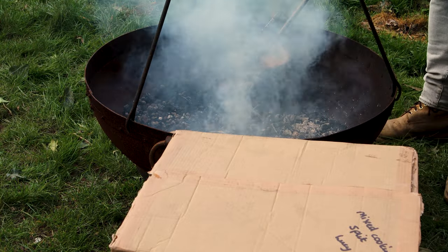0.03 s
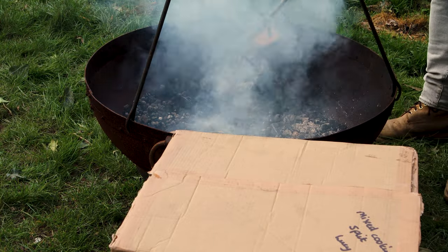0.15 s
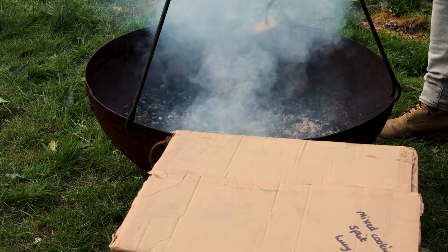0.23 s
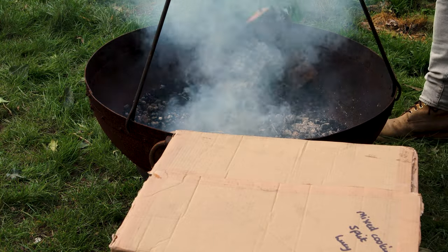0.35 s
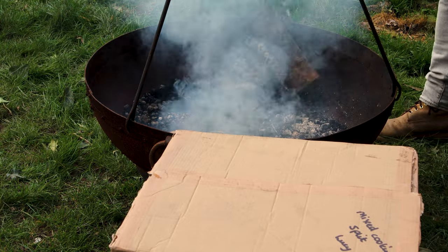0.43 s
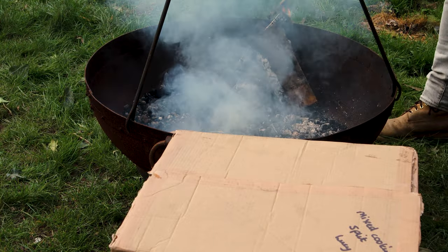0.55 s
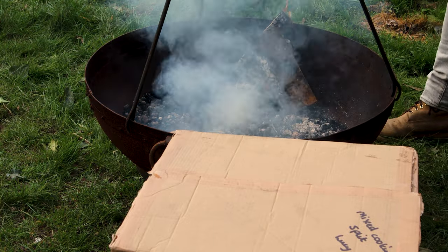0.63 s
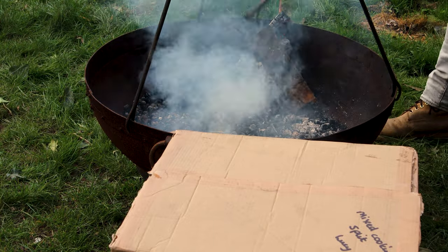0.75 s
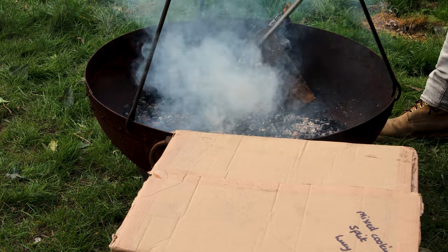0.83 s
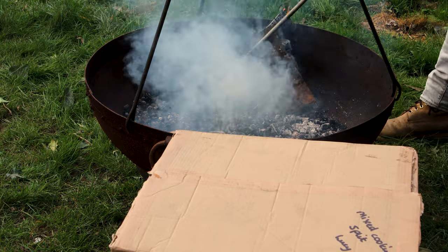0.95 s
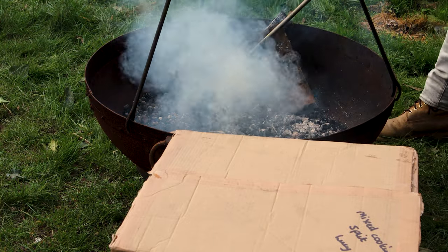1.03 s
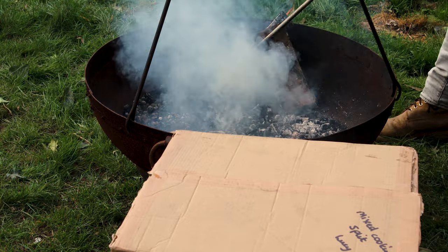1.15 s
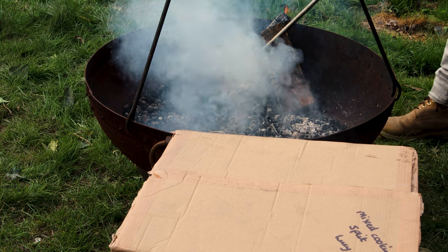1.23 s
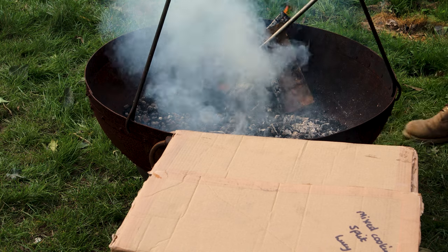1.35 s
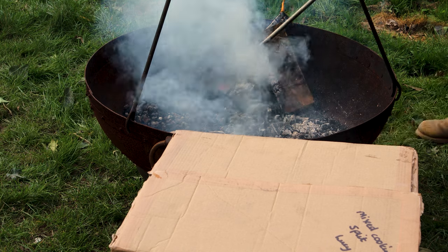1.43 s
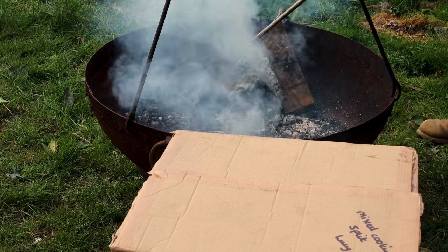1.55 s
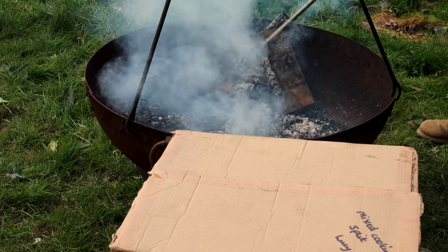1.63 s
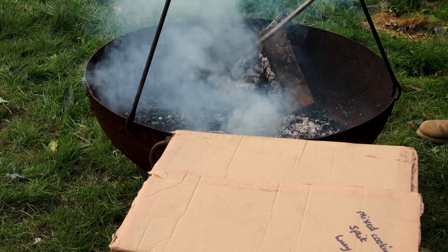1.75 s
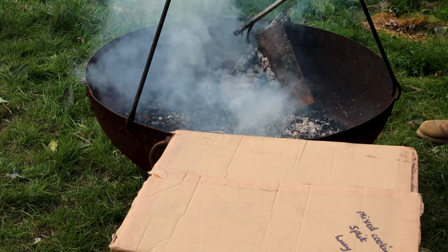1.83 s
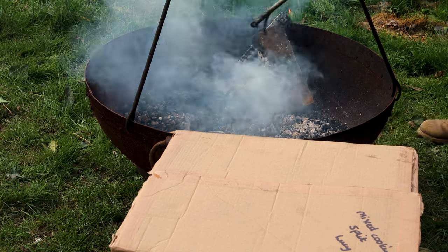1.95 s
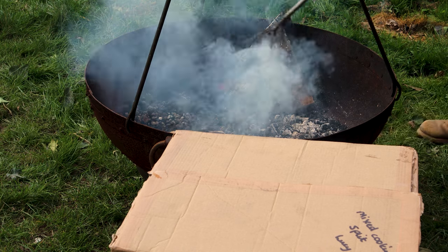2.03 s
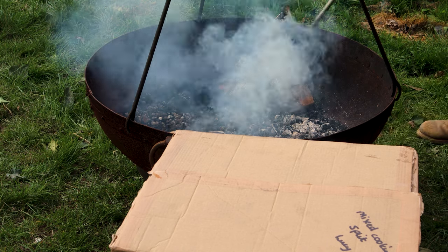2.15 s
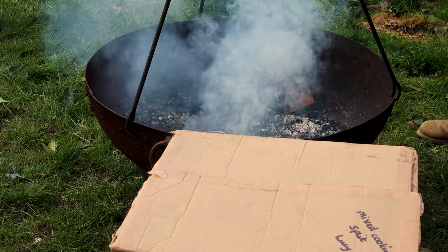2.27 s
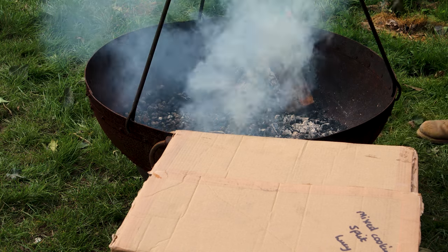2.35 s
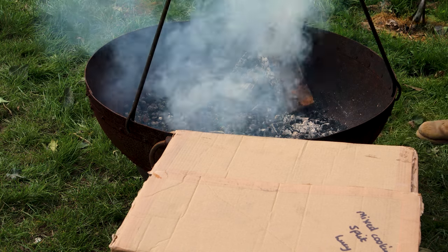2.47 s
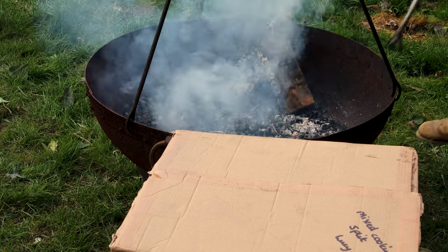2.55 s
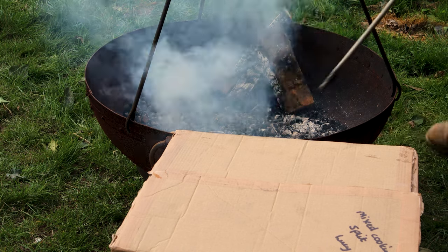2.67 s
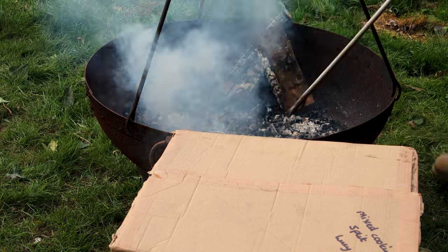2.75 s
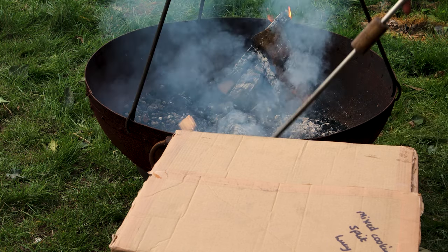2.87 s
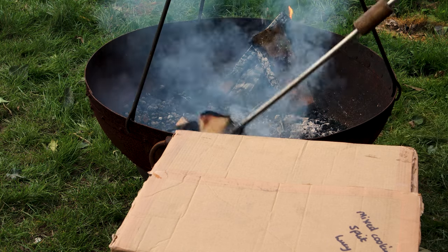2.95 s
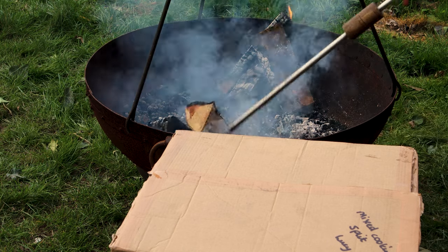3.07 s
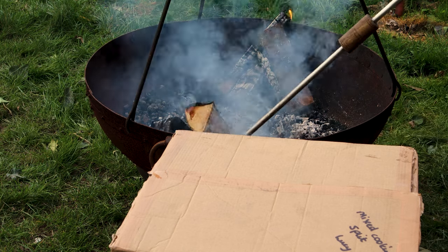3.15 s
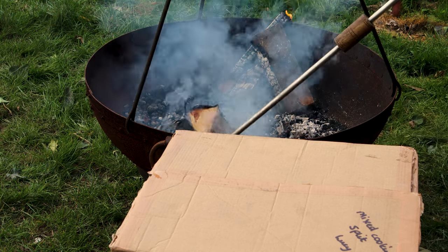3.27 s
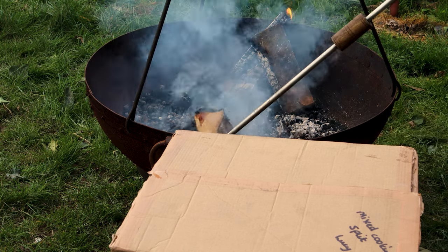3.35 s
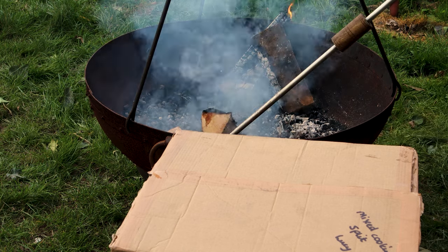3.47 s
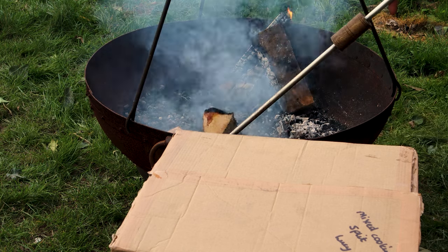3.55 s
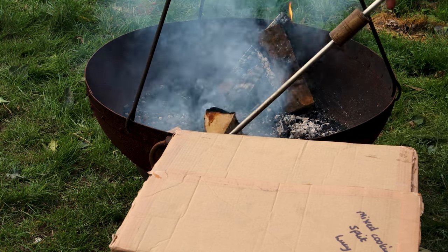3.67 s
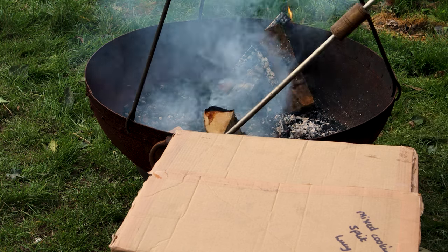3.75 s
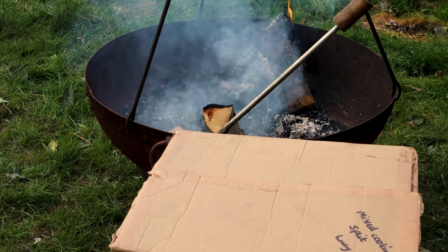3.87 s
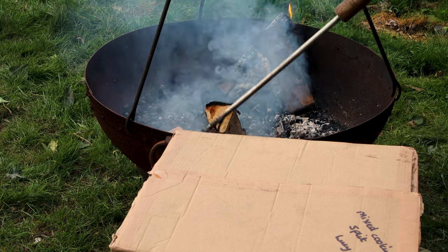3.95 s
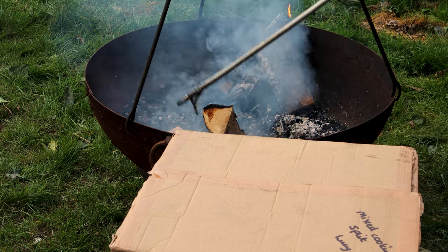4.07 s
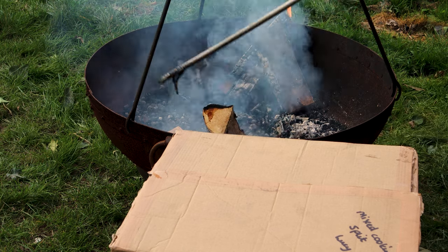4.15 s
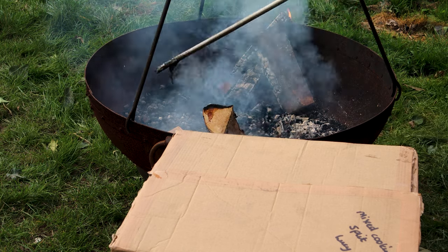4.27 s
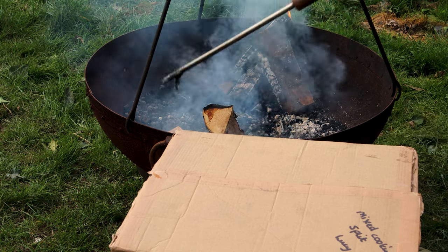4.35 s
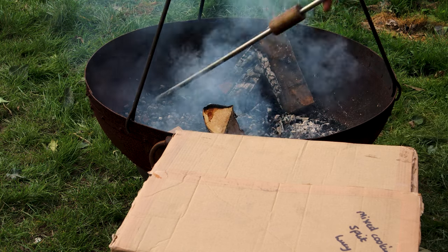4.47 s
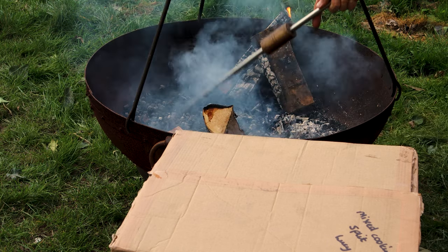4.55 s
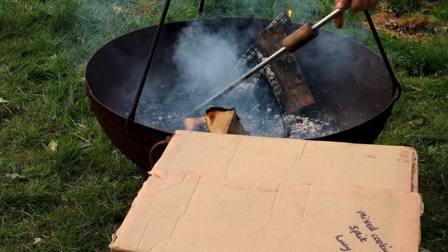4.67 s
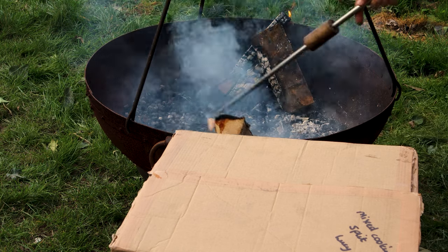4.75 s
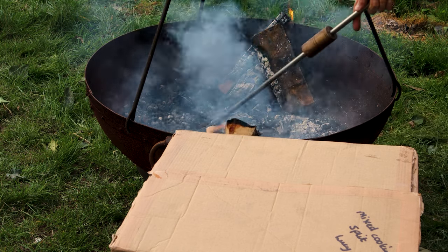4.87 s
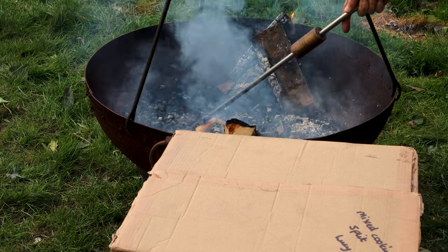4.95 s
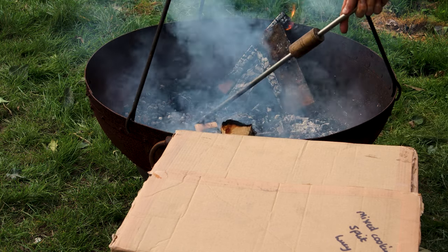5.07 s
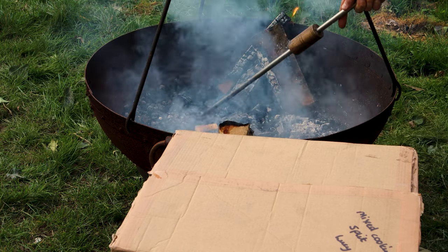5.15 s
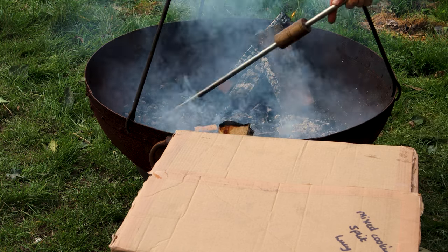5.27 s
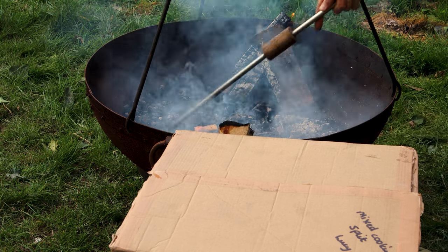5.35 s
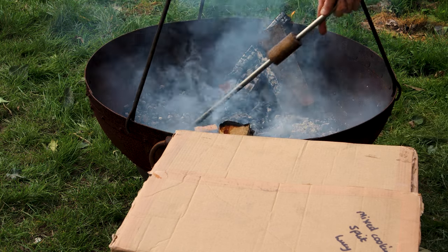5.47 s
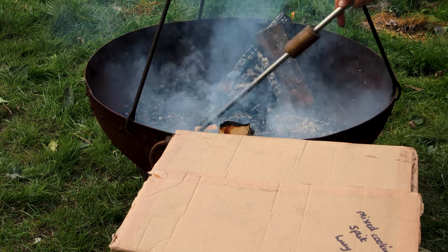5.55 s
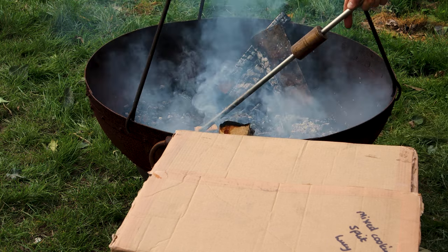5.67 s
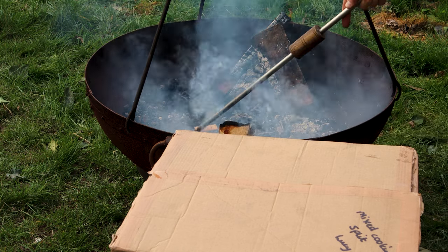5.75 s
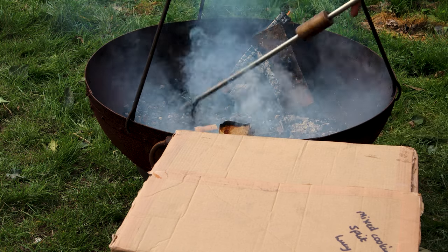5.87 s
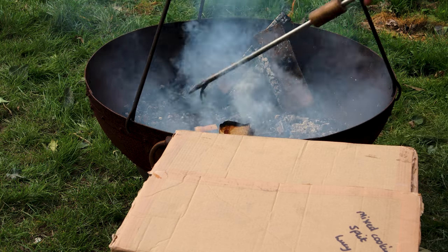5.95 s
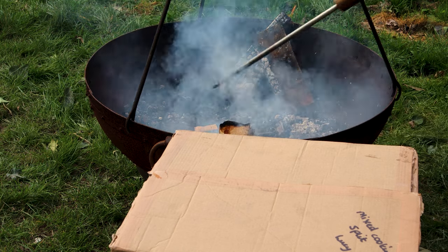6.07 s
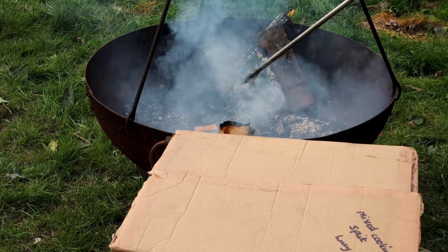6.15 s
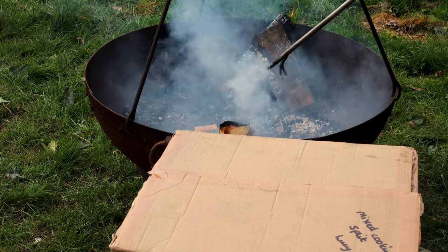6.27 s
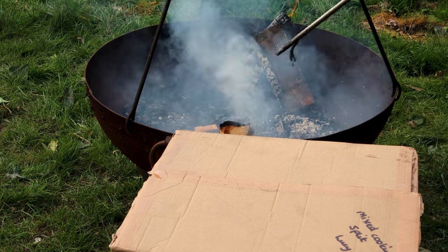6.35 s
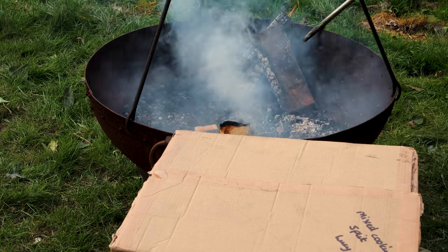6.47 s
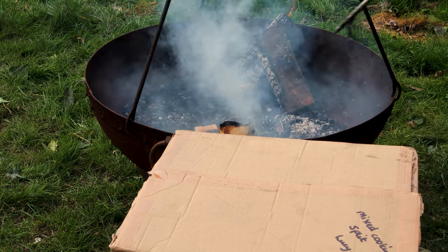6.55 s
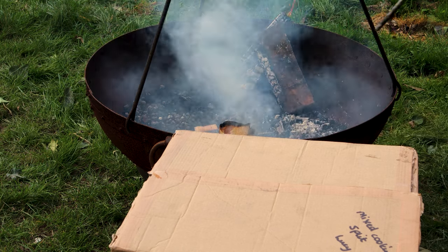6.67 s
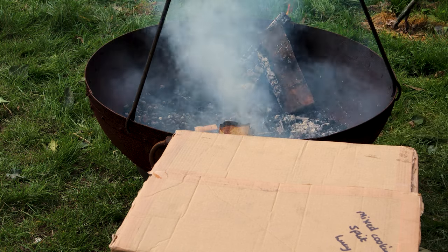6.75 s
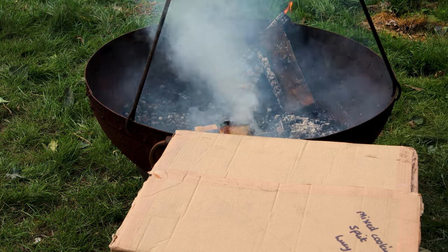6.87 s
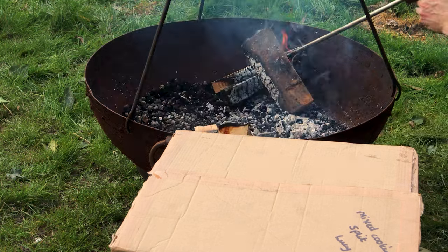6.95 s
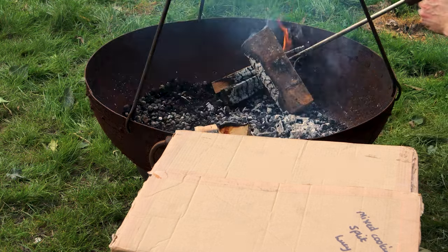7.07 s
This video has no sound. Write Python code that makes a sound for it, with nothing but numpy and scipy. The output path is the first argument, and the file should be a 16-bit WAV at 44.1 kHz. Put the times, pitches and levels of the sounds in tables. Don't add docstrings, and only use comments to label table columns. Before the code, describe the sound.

Close outdoor fire bowl on a lawn. Light clanks and wooden thuds lead quickly to one huge, clipped clang as a heavy log hits iron. Smaller knocks follow, then tongs rake gritty embers and scrape bare metal while a bird whistles two-note phrases from a tree. A log bumps down heavily, handling thins to crackles and pops, and a nearer bird chirps at the end.

```python
import sys
import numpy as np
from scipy import signal
from scipy.fft import rfft, irfft
from scipy.io import wavfile
from scipy.ndimage import uniform_filter1d

SR = 44100
rng = np.random.default_rng(int(sys.argv[2]) if len(sys.argv) > 2 else 0)


def ratio(d):
    e = np.asarray(d, float) / 20
    return 10 ** e


def inscribe(sig):
    pcm = np.round(np.clip(np.atleast_2d(sig).T, -1, 1) * 32767)
    wavfile.write(sys.argv[1], SR, pcm.astype(np.int16))


N = 313551


def level(x, db):
    return x * ratio(db) / np.sqrt(np.mean(x ** 2))


def peak(x, db):
    return x * ratio(db) / np.max(np.abs(x))


def add(out, x, start_s):
    i = int(start_s * SR)
    out[i:i + len(x)] += x[:N - i]


def seconds(length_s):
    return np.arange(int(length_s * SR)) / SR


def colour(x, points):
    hz, db = np.transpose(points)
    bins = np.maximum(np.fft.rfftfreq(len(x), 1 / SR), 1)
    gain = ratio(np.interp(np.log(bins), np.log(hz), db))
    return irfft(rfft(x) * gain, len(x))


def walk(rate):
    k = int(SR / rate)
    held = np.repeat(rng.standard_normal(N // k + 1), k)
    return 1.4 * uniform_filter1d(uniform_filter1d(held, k), k)[:N]


def grains(size, rate, spread_db):
    hit = rng.random(size) < rate / SR
    return hit * rng.standard_normal(size) * ratio(spread_db * np.minimum(rng.exponential(size=size), 3))


def ring(modes, stretch=1., scatter_db=0., length_s=0.16):
    hz, width, db = np.transpose(modes)[:, :, None]
    t = seconds(length_s)
    decay = width * np.exp(-np.pi * width * t)
    return np.sum(ratio(db + scatter_db) * decay * np.sin(2 * np.pi * hz * stretch * t), axis=0)


# pitch_hz, level_db (per Hz)
AIR_SPECTRUM = [(12, -43), (20, -13), (130, -0.5), (285, -8), (430, -13.5), (1810, -24), (3750, -23.5),
                (7000, -36)]
# time_s, level_db
WIND = [
    (0.0, -60),
    (0.55, -55.5),
    (0.69, -57),
    (2.199, -65),
    (4.06, -63.5),
    (4.22, -67),
    (4.851, -66),
    (7.11, -60.5),
]


def air():
    s, db = np.transpose(WIND)
    gust_db = np.interp(np.arange(N) / SR, s, db - np.mean(db))
    out = 0
    for hz in 30 * 2 ** np.arange(0, 9.1, .75):
        edges = [(hz / 2, -60), (hz / 1.25, 0), (hz * 1.25, 0), (hz * 2, -60)]
        band = colour(rng.standard_normal(N), edges)
        bass_share = np.clip(1.3 - np.log10(hz) / 3, 0, 1)
        out = out + band * ratio(2.0 * walk(9.8) + gust_db * bass_share)
    return level(colour(out, AIR_SPECTRUM), -58)


def garden(x, t60_s, db):
    t = seconds(.6)
    tail = colour(rng.standard_normal(len(t)), [(200, 1.0), (1500, -9.0), (5000, -5.0), (12000, -14.0)])
    tail = tail * ratio(-60 * t / t60_s)
    return signal.fftconvolve(x, tail * ratio(db) / np.sqrt(np.sum(tail ** 2)))[:N]


def whistle(rows):
    s, hz, db, warble_hz = np.transpose(rows)
    t = np.arange(s[0], s[-1], 1 / SR)
    edge = np.minimum(np.minimum(t - s[0], s[-1] - t) / 0.002, 1)
    noise = rng.standard_normal(SR // 2)[:len(t)]
    shake = level(uniform_filter1d(uniform_filter1d(noise, size=60), size=60), 0)
    pitch_hz = np.interp(t, s, hz) + np.interp(t, s, warble_hz) * shake
    return np.sqrt(2) * edge * ratio(np.interp(t, s, db)) * np.sin(2 * np.pi * np.cumsum(pitch_hz) / SR)


# time_s, pitch_hz, level_db, warble_hz
STRAY_NOTES = [
    [(.885, 4850, -73.5, 31), (.93, 4820, -79.5, 30.6)],
    [(5.9, 3790, -79.5, 58.5), (6.06, 3650, -79, 59.2)],
    [(2.61, 3994, -68, 169), (2.8, 4170, -83.5, 170)],
]
# level_start_s, pitch_share, level_db, fall_start_s, fall_level_db
SONG = [
    (2.974, .98, -51, 3.137, -45.5),
    (3.441, 0.99, -47.5, 3.648, -52.5),
    (3.966, 0.982, -51.5, 4.149, -50),
    (4.436, 0.98, -49.5, 4.646, -49.5),
]
# time_s (from its start), pitch_hz, level_db, warble_hz
LEVEL_NOTE = [(0, 4490, -7, 33), (.009, 4710, -5.5, 22), (0.044, 4910, 0.5, 21), (0.086, 5010, -2.5, 47),
              (.15, 4930, -13.5, 20), (.168, 4850, -22, 33)]
# time_s (from its start), pitch_hz, level_db, warble_hz
FALL_NOTE = [(0, 8200, -11, 200), (.012, 7600, -8, 280), (.03, 7150, -8, 200), (.039, 4600, -9, 60),
             (.048, 4080, -3, 45), (.075, 3850, 0, 50), (.1, 3740, -6, 40), (.27, 3670, -19, 70)]
SCOOP, LEVEL_HZ = [0.51, 0.945, 0.097, 1.006], 4900
# time_s, pitch_hz, level_db, warble_hz
NEAR_CHIRP = [
    [(7.01, 4270, -55, 40), (7.022, 4400, -51.5, 40), (7.036, 4540, -56.5, 40.6)],
    [(7.045, 3740, -43, 30), (7.053, 4187, -36.5, 29.8), (7.088, 4330, -42.5, 30)],
    [(7.092, 4150, -49.5, 40), (7.1, 4180, -47, 40), (7.11, 4200, -48, 40.2)],
    [(7.008, 4680, -52, 40), (7.04, 4720, -58.5, 40), (7.11, 4700, -62, 60)],
]
# time_s, pitch_hz, level_db, warble_hz
NEAR_SECOND_VOICE = [
    [(7.018, 3300, -55.5, 96), (7.036, 3300, -59.5, 99.6)],
    [(7.05, 3300, -69, 99), (7.11, 3330, -71.5, 102.4)],
    [(7.078, 5100, -68, 99), (7.1, 5000, -58.5, 100)],
]


def birds():
    far, near = np.zeros(N), np.zeros(N)
    for note in STRAY_NOTES:
        add(far, whistle(note), note[0][0])
    for (s, share, db, fall_s, fall_db), scoop in zip(SONG, SCOOP):
        bend = (np.array(LEVEL_NOTE) - [0, LEVEL_HZ, 0, 0]) * [1, scoop, 1, 1]
        add(far, whistle(bend + [0, share * LEVEL_HZ, 0, 0]) * ratio(db), s)
        add(far, whistle(FALL_NOTE) * ratio(fall_db), fall_s)
    for note in NEAR_CHIRP + NEAR_SECOND_VOICE:
        add(near, whistle(note), note[0][0])
    return far + garden(far, 0.42, -3.5) + near + garden(near, 0.16, -13.5)


# pitch_hz, level_db (per Hz)
GRIT = [(2060, -25.5), (3500, -1.5), (3780, -3.5), (4490, -10.5), (4840, -11.5), (5360, -14.5),
        (8820, -12.5), (16000, -27)]
# start_s, peak_db, pitch_hz, click_db
POPS = [(.263, -47.5, 3720, -55), (.71, -32.5, 4480, -59.5), (.835, -38.5, 3330, -43),
        (.8669, -30.5, 7070, -51.5), (.9454, -43, 3230, -50), (1.5085, -35.5, 2740, -44),
        (1.728, -40.5, 3840, -60), (1.7474, -32.5, 8580, -60), (1.8198, -32, 2700, -40.5),
        (1.8447, -25, 3700, -44), (2.1455, -33, 3800, -67), (2.3321, -36.5, 4860, -50),
        (2.7526, -36, 3740, -46), (2.817, -36.5, 2700, -47), (2.8784, -23, 3420, -38.5),
        (3.246, -25, 3460, -57), (5.0014, -40.5, 1550, -47.5), (5.0674, -36, 2700, -45),
        (5.0983, -30, 3990, -59.5), (5.2021, -33, 3220, -65.5), (5.5189, -24.5, 3580, -54),
        (5.5487, -26, 3330, -41.5), (5.5674, -36, 3420, -38), (6.0716, -30, 4750, -45),
        (6.3535, -31, 3110, -68.5), (6.3704, -20.5, 3170, -50), (6.568, -30.5, 3370, -54),
        (6.8709, -28, 3275, -58.5), (6.8864, -40, 4000, -60)]
# start_s, peak_db
TICKS = [(0.127, -42.5), (.164, -35), (.195, -40.5), (.218, -43), (.808, -43.5), (1.058, -34),
         (1.2315, -38.5), (1.292, -41.5), (1.192, -43.5), (1.5789, -42), (1.871, -36.5), (1.908, -45.5),
         (1.921, -46), (1.971, -43.5), (1.9825, -39.5), (2.1003, -42), (2.4582, -36.5), (2.572, -41.5),
         (2.612, -45), (2.722, -42), (2.766, -45), (3.41, -38.5), (4.405, -44), (4.458, -43), (4.508, -36),
         (4.582, -41.5), (5.137, -43), (5.18, -42.5), (5.255, -48.5), (5.31, -47), (5.47, -40.5),
         (5.587, -35.5), (6.059, -37.5), (6.2, -45), (6.2404, -42), (6.276, -42), (6.6976, -38),
         (6.7445, -37.5), (6.9258, -44.5)]
TICK_HZ, TICK_CLICK_DB = 3300, -13


def fire():
    out, t = np.zeros(N), seconds(0.072)
    ticks = [(s, db, TICK_HZ * ratio(0.65 * rng.standard_normal()), db + TICK_CLICK_DB) for s, db in TICKS]
    for s, db, hz, click_db in POPS + ticks:
        noise = rng.standard_normal(len(t))
        cycles = t * hz
        note = np.sin(2 * np.pi * cycles) * np.minimum(cycles / 2.1, 1) * np.exp(-cycles / 0.76)
        note = note + 0.034 * noise * np.exp(-t / 0.0029)
        click = np.diff(noise * np.exp(-t / 0.00046))
        add(out, peak(note, db - 4.5), s)
        add(out, peak(click, click_db + 12.5), s)
    scatter = np.diff(colour(grains(N + 1, 150, 1.8), GRIT))
    return out + level(scatter, -74.5)


# start_s, length_s, level_db, pitch_hz
SPITS = [(0.251, .02, -52.5, 7040), (0.379, .012, -43, 9000), (.418, .008, -52, 8500),
         (0.476, .014, -50, 8000), (0.744, 0.014, -54, 9000), (1.004, .02, -51.5, 7470),
         (2.897, .016, -44, 9980), (2.954, .03, -39.5, 13170), (3.276, .014, -53.5, 9000),
         (3.49, .012, -62, 6940), (3.53, .015, -59, 7000), (3.899, .09, -50, 8850),
         (4.775, .045, -54, 12000), (4.91, .085, -53, 9500), (5.418, .025, -58, 13100),
         (5.47, .008, -53.5, 10000), (5.495, .006, -61, 10100), (5.535, .006, -53.5, 12000),
         (5.59, .012, -47.5, 12050), (5.676, .016, -60, 11000), (6.346, .008, -63.5, 11000)]
# start_s, peak_db, pitch_hz
SPARKS = [(0.3035, -54, 10300), (0.3272, -44, 8200), (0.814, -36, 11800), (0.9272, -42, 14700),
          (0.9356, -34, 8300), (0.9743, -41.5, 7170), (2.888, -29, 9570), (2.9332, -35, 14300),
          (3.089, -41, 9450), (4.72, -48, 8550), (4.8317, -34.5, 8060), (4.8474, -33, 9150),
          (4.9457, -36, 9010), (5.365, -56.5, 8710), (5.6514, -52, 8440), (5.7359, -51.5, 13380),
          (6.3733, -43.5, 7100), (6.4864, -22, 10940), (6.6709, -53, 7150), (6.7755, -52.5, 10130),
          (6.81, -52, 8700), (6.847, -56, 7750), (6.886, -50, 9460), (6.9436, -47, 7100)]


def ash():
    out, t = np.zeros(N), seconds(.01)
    for s, long, db, hz in SPITS:
        u = seconds(long + .03)
        force_db = np.interp(u, [0, .004, long, long + .03], [-15, 0.5, -0.5, -46])
        band = [(hz / 4, -25), (hz / 1.6, -5.0), (hz, 0), (hz * 1.1, -7.0)]
        burst = colour(grains(SR // 4, 9000, 2.2)[:len(u)], band)
        add(out, level(burst, db) * ratio(force_db), s)
    for s, db, hz in SPARKS:
        add(out, peak(np.sin(2 * np.pi * hz * t) * t * np.exp(-t * hz), db + 0.5), s)
    return out


# start_s, peak_db, pitch_hz,
# width_hz
BUMPS = [(1.8195, -41, 896, 900), (1.8445, -45, 700, 700), (1.673, -28, 714, 150), (3.283, -37, 340, 49.7),
         (3.335, -39, 357, 50), (1.086, -31.5, 404, 40), (3.339, -48, 610, 21.8), (3.4275, -31.5, 191, 30),
         (3.428, -29, 495, 60), (3.432, -26, 572, 32.3), (3.805, -26.5, 394, 50), (4.827, -8, 268, 170),
         (4.8275, -20, 620, 150), (4.8405, -14, 497, 55), (4.8445, -22, 804, 40), (4.861, -18, 523, 90),
         (4.876, -28, 476, 120), (4.893, -35, 400, 49.9), (6.3704, -42, 1000, 900),
         (6.871, -45.5, 1197, 900)]
# start_s, peak_db, pitch_hz,
# width_hz
PINGS = [(.579, -20, 1700, 34), (.58, -28, 2465, 33), (.602, -27, 1740, 37), (1.1374, -34, 1770, 87),
         (1.673, -31, 1100, 120), (2.851, -27, 1420, 25), (2.894, -29.5, 1390, 40), (3.956, -28, 359, 21),
         (3.8063, -28, 1640, 27), (3.8067, -22, 2590, 35), (3.968, -35, 2065, 14), (5.711, -50.5, 1484, 35),
         (6.698, -50, 2330, 48)]


def bumps():
    out, t = np.zeros(N), seconds(.15)
    for s, db, hz, width in BUMPS + PINGS:
        rise = np.sin(np.pi / 2 * np.minimum(t * hz, 1)) ** 2
        add(out, peak(rise * np.exp(-np.pi * width * t) * np.sin(2 * np.pi * hz * t), db), s)
    return out


# start_s, iron_db, log_db, grit_db, fade_db_per_s
SLIDES = [(.001, -54, -72, -60, 214), (.134, -49.5, -38.5, -69, 296), (.26, -50, -48.5, -57, 62),
          (.385, -39.5, -30.5, -44, 148), (0.502, -6.5, -7, -31.5, 427), (.55, -34, -34, -62, 134),
          (.6, -40, -37, -64.5, 311), (.724, -50.5, -70.5, -52.5, 169), (.93, -51.5, -41, -55, 202),
          (1.088, -45, -34, -70, 190), (1.14, -46.5, -49.5, -65.5, 257.5), (1.68, -63.5, -53.5, -64, 99),
          (3.29, -45.5, -36, -53, 387), (3.338, -40, -32, -52, 305), (3.44, -42.5, -39, -51, 200),
          (3.984, -35.5, -38.5, -41, 260), (4.61, -52, -47.5, -52, 301), (5.005, -51, -55, -58, 71),
          (5.412, -48, -49.5, -59.5, 204), (5.612, -55, -54, -63, 253), (5.689, -58, -65, -66.5, 122.5)]
# loudest_s, iron_db, log_db, grit_db, fade_db_per_s
ROLLS = [
    (4.842, -21.5, -18.5, -55, 329),
    (4.884, -37, -40, -56, 500.5),
]
# end_s, iron_db, log_db, grit_db, rise_db_per_s
PUSHES = [(.134, -44.5, -62, -56.5, 153), (.386, -41, -38, -48, 1800), (0.67, -53, -45, -64.5, 299.5),
          (1.185, -46, -44, -61.5, 91), (3.287, -35, -37, -52, 1499), (3.418, -40, -41, -58, 401),
          (3.433, -33, -39, -42, 2500.5), (3.8, -39, -45, -59, 149), (3.807, -27, -37, -60, 901),
          (3.97, -37, -30.5, -48, 219), (4.829, -38, -45, -44.5, 128), (5.684, -50, -60, -50, 1499)]
# start_s, length_s, iron_db, log_db, grit_db
RAKES = [(.576, .014, -21.5, -38, -42.5), (.6, 0.0039, -37, -41, -68), (1.3, 0.19, -61, -64, -63.5),
         (2.853, 0.052, -40, -43.5, -49), (2.884, 0.045, -42, -56, -45), (2.957, 0.029, -47.5, -48.5, -46),
         (2.98, 0.069, -43.5, -57.5, -50.5), (3.06, 0.061, -43, -62, -54), (3.135, 0.024, -54, -63.5, -67),
         (3.49, 0.0094, -51.5, -60.5, -56), (3.53, 0.0082, -47.5, -56, -60.5),
         (3.58, 0.0056, -57, -63, -60), (3.632, 0.048, -54.5, -65, -63), (3.695, 0.059, -61, -62, -48.5),
         (4.905, 0.088, -41.5, -48, -43), (5.425, .018, -41.5, -40, -61), (5.467, .008, -50, -42, -58),
         (5.492, 0.012, -47, -49, -59), (5.514, 0.022, -43, -45.5, -56), (5.545, 0.019, -41.5, -42, -48.5),
         (5.58, 0.013, -39, -46, -59), (6.564, 0.33, -62.5, -67, -70), (2.03, .11, -66, -54.5, -76.5),
         (4.1, 0.023, -56, -46, -58.5), (7.02, 0.052, -61, -57, -62.5)]
# start_s, length_s, iron_db, log_db, grit_db
SCRAPES = [
    (3.7, 0.087, -56, -53.5, -73),
    (3.81, 0.13, -36, -31.5, -56),
    (3.953, 0.0294, -29.5, -26.5, -55),
    (4.0, 0.085, -49.5, -43.5, -57.5),
]
# damping share, tilt in dB per octave, grain dB, damping share of the log
SLIDE_TOUCH, PUSH_TOUCH, SCRAPE_TOUCH = (4.5, 2, 1.1, 1.5), (1.1, 3, 1.3, 7.9), (0.9, 0.34, 3.1, 0.26)
ROLL_TOUCH, RAKE_TOUCH = (4.5, -10, 1, 1.5), (2.4, 4.8, 1.8, 2.03)
ROLL_RISE_S = 0.013
GRAB_S, GRAB_DB = 0.0031, -14.5
EDGE_DB_PER_S, RANGE_DB = 1300, 35


def strokes():
    rows = []
    for s, *db, fade in SLIDES:
        rows.append(([s, s + RANGE_DB / fade], [0, -RANGE_DB], db, SLIDE_TOUCH))
    for s, *db, fade in ROLLS:
        rows.append(([s - ROLL_RISE_S, s, s + RANGE_DB / fade], [GRAB_DB, 0, -RANGE_DB], db, ROLL_TOUCH))
    for s, *db, rise in PUSHES:
        rows.append(([s - RANGE_DB / rise, s], [-RANGE_DB, 0], db, PUSH_TOUCH))
    for table, touch in ((RAKES, RAKE_TOUCH), (SCRAPES, SCRAPE_TOUCH)):
        for s, long, *db in table:
            held, end = s + GRAB_S, s + GRAB_S + long
            times = [s, held, end, end + RANGE_DB / EDGE_DB_PER_S]
            rows.append((times, [GRAB_DB, 0, 0, -RANGE_DB], db, touch))
    return rows


# pitch_hz, width_hz, level_db
TONGS_MODES = [(960, 26, -5.5), (1500, 30, 1.5), (1640, 46, 2), (1824, 53, 1), (1972, 23, 1.5),
               (2125, 90, 1), (2437, 41, 1), (2590, 40, 2), (2830, 59, -2), (3070, 100, -4.5),
               (3420, 45, -8), (3820, 45, -4.5), (4230, 39, -14), (4860, 18, -14.5)]
# pitch_hz, width_hz, level_db
LOG_MODES = [(193, 80, -7.5), (362, 120, -3.5), (579.4, 46, 1), (702, 60, -9), (982, 38, -8.5)]


def drags():
    out, uneven, crumble = np.zeros(N), ratio(1.8 * walk(60)), ratio(0.7 * walk(70))
    grip = walk(13)
    grit = level(colour(crumble * grains(N, 7200, 2.4), GRIT), 0.79)
    for s, force_db, peaks_db, (damping, tilt_db, grain_db, log_damping) in strokes():
        i = np.arange(max(int(s[0] * SR), 0), min(int(s[-1] * SR), N))
        iron_db, log_db, grit_db = (np.interp(i / SR, s, force_db) + db for db in peaks_db)
        slip = level(uneven[i] * grains(SR, 5000, grain_db)[:len(i)], 0)
        tilt = tilt_db * np.log2(np.array(TONGS_MODES)[:, :1] / 2000)
        bodies = (
            (TONGS_MODES[::2], iron_db - 10.0 + 0.87 * grip[i], tilt[::2], damping),
            (TONGS_MODES[1::2], iron_db - 6.0 - 2.2 * grip[i], tilt[1::2], damping),
            (LOG_MODES, log_db - 5.0 + 0.8 * grip[i], 0, log_damping))
        for modes, db, lean_db, wide in bodies:
            stretch = 1 + .004 * damping * rng.standard_normal()
            body = ring(np.array(modes) * [1, wide, 1], stretch, lean_db)
            body = body / np.sqrt(np.sum(body ** 2))
            add(out, signal.fftconvolve(slip * ratio(db), body), max(s[0], 0))
        out[i] += grit[i] * ratio(grit_db)
    return out


# start_s, iron_peak_db, iron_pitch_hz, log_peak_db, grit_peak_db
CLANKS = [(0.073, -34.5, 3070, -64, -41), (0.2585, -45, 3480, -55, -44), (0.7248, -37, 3640, -37.5, -36.5),
          (1.081, -32, 2420, -37, -29), (1.136, -33, 1581, -39, -57.5), (2.8509, -24, 3550, -36.5, -40),
          (2.902, -28, 3280, -42.5, -34), (3.2865, -32, 2446, -42, -47.5), (3.805, -19.5, 2070, -46, -55),
          (3.98, -33, 2060, -46, -55), (4.0735, -41.5, 4080, -34.5, -37.5),
          (4.6031, -22.5, 2240, -29.5, -40), (5.1597, -43, 2920, -58, -46), (5.4087, -28, 3510, -48.5, -57),
          (5.6032, -29, 2830, -39, -40.5), (5.608, -31, 2920, -41, -53), (5.684, -47, 4140, -74.5, -50)]
# start_s, log_peak_db, log_pitch_hz, iron_peak_db, grit_peak_db
THUDS = [(0.109, -19, 218, -38, -53.5), (.386, -24, 285, -38, -31.5), (0.4043, -28.5, 565, -39, -53.5),
         (0.4974, -13, 407, 3, -17.5), (0.9177, -24.5, 573, -33.5, -40.5), (1.0038, -38.5, 371, -57, -46.5),
         (1.672, -24, 635, -32, -43), (2.4951, -43, 284, -52.5, -57.5), (2.886, -33.5, 620, -28, -40.5),
         (3.333, -41, 570, -35.5, -58), (4.834, -23, 674, -26.5, -42.5)]
LOG_HZ, BOWL_HZ = 340.8, 1900


def blows():
    rows = []
    for s, iron, hz, log, grit in CLANKS:
        rows.append((s, iron, log, grit, LOG_HZ * (1 + 0.18 * rng.standard_normal()), hz))
    for s, log, hz, iron, grit in THUDS:
        rows.append((s, iron, log, grit, hz, BOWL_HZ * (1 + 0.18 * rng.standard_normal())))
    return rows


# pitch_hz, width_hz, level_db
IRON_MODES = [(1420, 8.7, -10), (1490, 5.9, -7), (1950, 17, 2.5), (2440, 47, 0.5), (2530, 18, -6),
              (2600, 30, -2.5), (2950, 64, 3), (3490, 37, 2), (3690, 15, -3.5), (4080, 17, -3),
              (4360, 3.7, -14.5), (4140, 15, -19), (5070, 65, -20)]


def knocks():
    out, t = np.zeros(N), seconds(.25)
    for s, iron_db, log_db, grit_db, log_hz, iron_hz in blows():
        fade = np.minimum(t / 0.0012, 1) * ratio(-60 * t / (0.07 * ratio(0.07 * iron_db)))
        rattle = fade * (1 + 1.3 * np.exp(-t / 0.00082)) * grains(len(t), 12000, 1.2)
        stretch = 1 + 0.041 * rng.standard_normal()
        scatter_db = 1.2 * rng.standard_normal((len(IRON_MODES), 1))
        damped = ring(np.array(IRON_MODES) * [1, 2.2, 1], stretch, scatter_db)
        iron = signal.fftconvolve(rattle, damped + ring([(iron_hz, 160, 5)]))
        wood = ring([(log_hz, 60, 0), (1.6 * log_hz, 130, -8), (0.54 * log_hz, 80, -13), (2.5 * log_hz, 250, -17)])
        log = signal.fftconvolve(uniform_filter1d(rattle * fade ** 0.85, size=16), wood)
        grit = colour(fade * grains(len(t), 13000, 0.93), GRIT)
        add(out, peak(iron, iron_db + 3.0) + peak(log, log_db + 2.0), s)
        add(out, peak(grit, grit_db + 10.0), s)
    return out


# pitch_hz, level_db, t60_s
BOWL_MODES = [(398, -7.5, 0.27), (599, -6.5, 0.12), (700, -7, 0.08), (1403, -4, .14), (1554, -7, 0.14),
              (1655, -4, 0.16), (1800, -5, .1), (1860, -1, 0.1), (1952, -3, 0.12), (2493, -8, .12),
              (2612, -9.5, 0.12), (2860, -8, 0.1), (3885, -3.5, 0.07), (3940, -5, .07)]


def drop():
    out, t = np.zeros(N), seconds(.1)
    rattle = np.minimum(t / 0.0008, 1) * np.exp(-t / 0.012) * grains(len(t), 9000, 2.5)
    hz, db, t60_s = np.transpose(BOWL_MODES)
    width = 1.2 * np.log(1000) / (np.pi * t60_s)
    modes = np.transpose([hz, width, db - 20 * np.log10(width)])
    add(out, peak(signal.fftconvolve(rattle, ring(modes, length_s=.35)), 2.5), .4977)
    return out


def scene():
    no_bass = signal.butter(4, 185., "high", fs=SR, output="sos")
    bowl = signal.sosfilt(no_bass, fire() + ash() + bumps() + drags() + knocks() + drop())
    return (air() + birds() + bowl + garden(bowl, 0.21, -27.5))[None]


def low_pass(x):
    return signal.sosfilt(signal.butter(12, 16200, fs=SR, output="sos"), x)


def record(dry):
    hard = np.clip(dry, -1, 1)
    over = np.abs(dry - hard)
    thump = signal.lfilter([.035], [1, -np.exp(-1 / (0.0019 * SR))], over)
    offset = signal.lfilter([.0026], [1, -np.exp(-1 / (.07 * SR))], over)
    treble_limit = signal.butter(8, 17500., fs=SR, output="sos")
    return low_pass(signal.sosfilt(treble_limit, hard + thump + offset))


dry = scene()
out = record(dry)
inscribe(out)
```